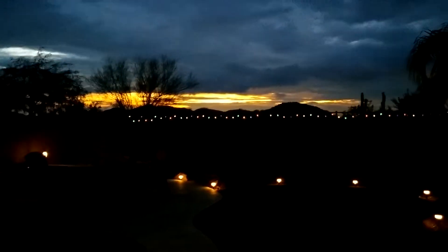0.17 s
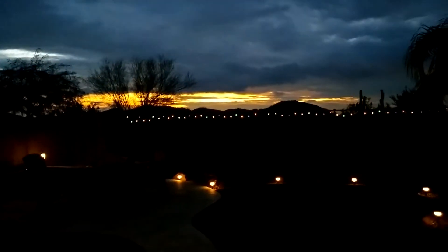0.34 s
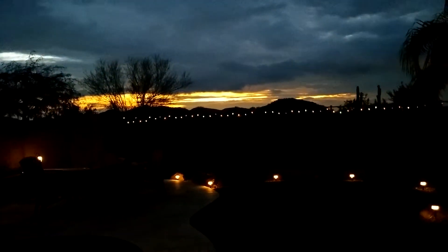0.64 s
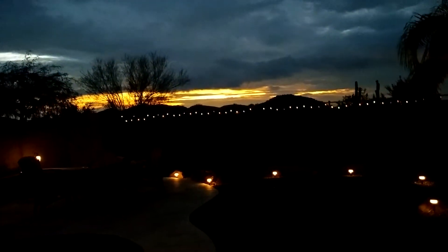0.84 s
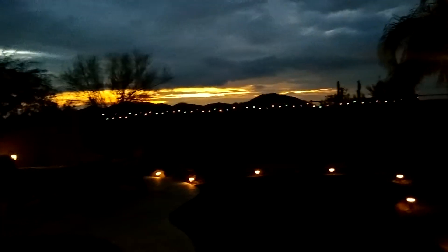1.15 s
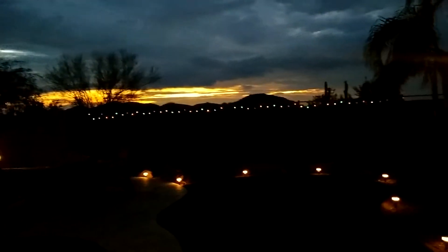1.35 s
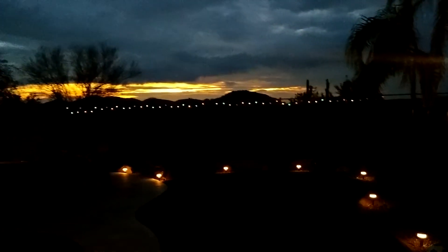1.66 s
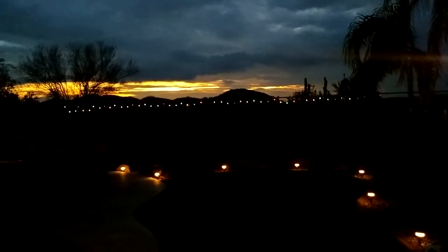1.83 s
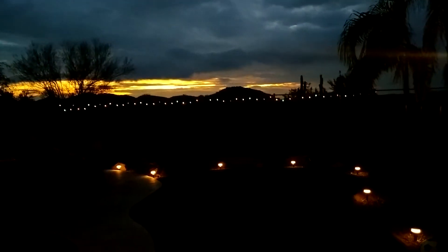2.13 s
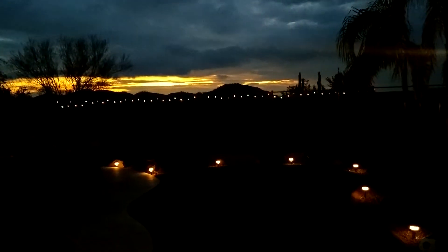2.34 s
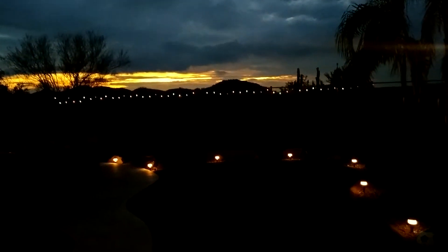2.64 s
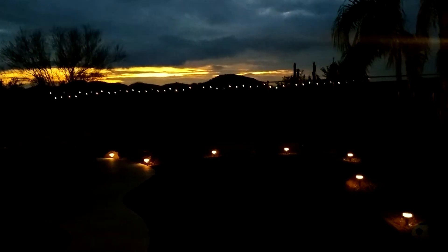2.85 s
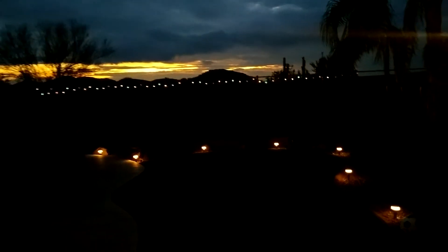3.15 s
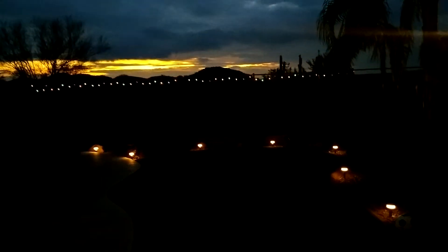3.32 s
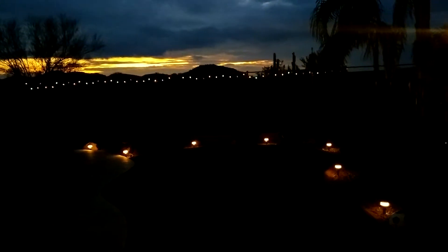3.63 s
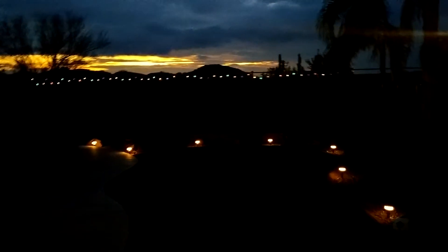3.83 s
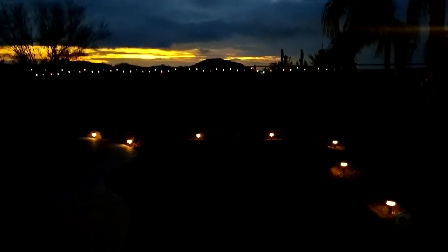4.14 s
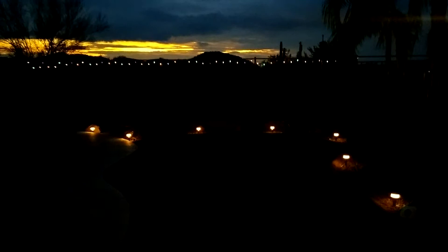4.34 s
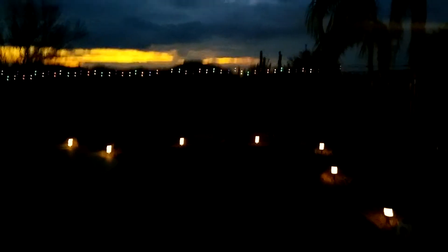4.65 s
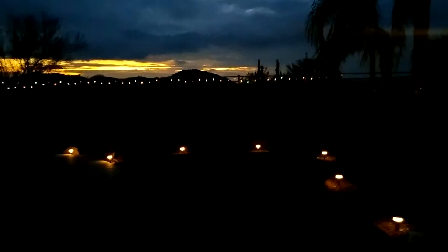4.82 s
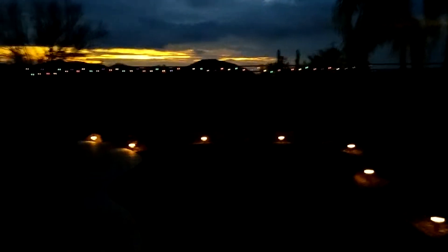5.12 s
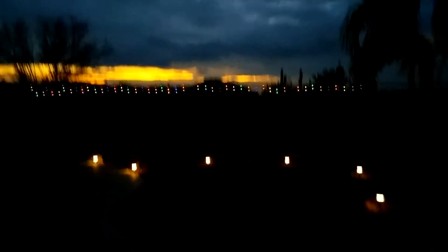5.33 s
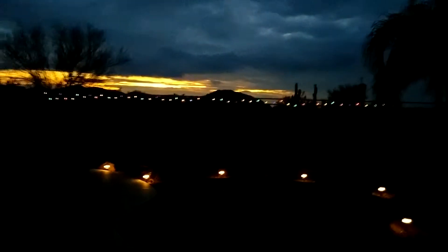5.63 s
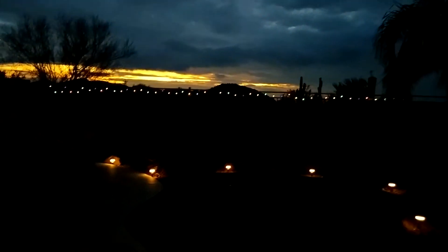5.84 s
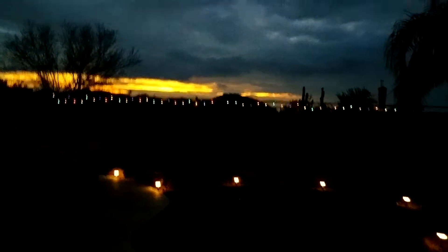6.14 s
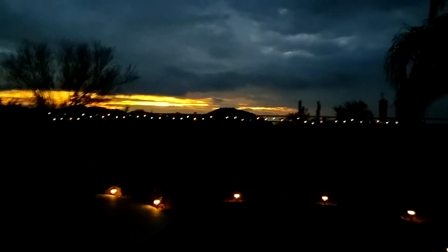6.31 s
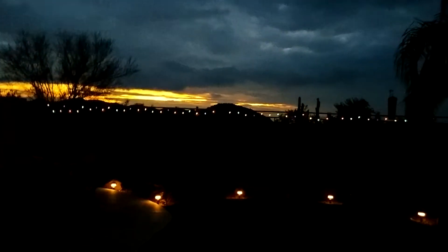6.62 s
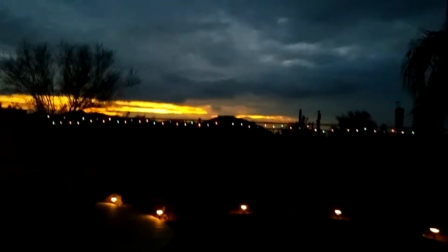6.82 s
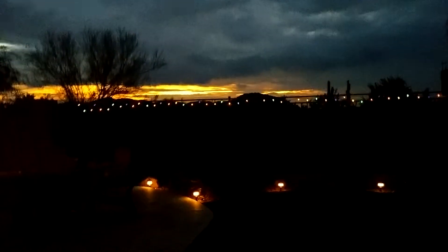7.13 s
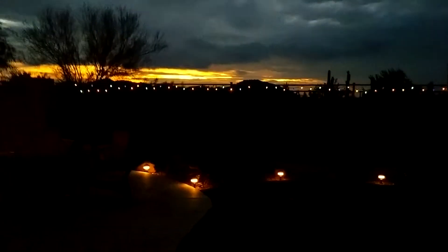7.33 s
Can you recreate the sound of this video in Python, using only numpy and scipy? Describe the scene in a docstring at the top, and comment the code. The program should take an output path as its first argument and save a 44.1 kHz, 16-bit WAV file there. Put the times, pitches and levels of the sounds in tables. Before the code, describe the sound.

Two short coyote calls in a quiet backyard, one scooping up to a high held note, the other a louder run of yips.

```python
"""A coyote howls twice near a backyard at dusk: a rising note that breaks into a high held one, then a
louder, wavering chain of yips. Its vocal folds make an almost pure tone, and its throat shapes the
overtones. House and garden walls throw the voice back, a faint tail hangs over the desert, and hiss
and rumble swell with each howl. Far animals answer faintly and a far motor drones for a moment.
Small ticks and knocks sound near the microphone; faint hisses come and go over a distant town."""
import sys
import numpy as np
from scipy import signal
from scipy.fft import rfft, irfft, next_fast_len
from scipy.io import wavfile
from scipy.ndimage import uniform_filter1d

SR = 44100
rng = np.random.default_rng(int(sys.argv[2]) if len(sys.argv) > 2 else 0)


def transcribe(signal):
    """Save signal, clipped to [-1, 1], as a 16-bit WAV file at the path in sys.argv[1]."""
    frames = np.atleast_2d(signal).T
    limited = np.clip(frames, -1, 1)
    pcm = np.round(limited * 32767).astype(np.int16)
    wavfile.write(sys.argv[1], SR, pcm)


N = 329427
TIME = np.arange(N) / SR

# The first howl scoops upward, breaks into a high note, cracks once, drops back down and ends.
SCOOP_S, BREAK_S, DROP_S, END_S = .772, .912, 1.572, 1.612
CRACK_S, CRACK_LENGTH_S = 1, 0.031

# How the throat shapes the overtones when the mouth is narrow. Each row: frequency in Hz, gain in dB.
NARROW_MOUTH = [(1000, -11.5), (1350, 11), (1600, -5.5), (1850, -12.5), (2100, -8), (2380, -9), (2700, -29),
                (3200, -31), (3600, -56), (10000, -51)]
# The yips of the second howl. Each row: start in seconds, length in seconds, first, top and last pitch
# in Hz, relative level in dB, dip at both ends in dB, share of the yip gone by at its loudest,
# relative overtone level in dB, growl from 0 to 1, relative lift of the upper overtones in dB.
YIPS = [(5.612, 0.13, 484.5, 661, 620, -24.5, 11, 0.64, -55.5, 0.7, 10),
        (5.788, 0.12, 544.6, 798.2, 585.4, -16, 25, 0.46, -45.5, 0.4, 6),
        (5.91, 0.145, 579, 805.3, 668, -20.5, 17, 0.6, -46.5, 0.12, 2),
        (6.055, .13, 681.5, 828, 650, -19.5, 20.5, .45, -46.5, 0.12, 3),
        (6.187, 0.128, 678, 842, 667, -25, 15.5, 0.42, -48, 0.26, 2.5),
        (6.319, 0.13, 657.5, 825.3, 584.5, -22.5, 24.5, 0.45, -50, 0.15, -1),
        (6.504, 0.097, 582, 747.6, 590.5, -24.5, 34.5, 0.52, -52, 0.35, 0)]


def undb(db):
    """Turns decibels into a number to multiply a sound by."""
    return 10 ** (np.asarray(db) / 20)


def curves(table):
    """Joins each column's values with straight lines; the first column gives the times."""
    times, *columns = np.transpose(table)
    return [np.interp(TIME, times, column) for column in columns]


def during(table):
    """One while a table lasts, with short fades to zero outside it."""
    start, end = table[0][0], table[-1][0]
    return np.interp(TIME, [start - .01, start, end, end + 0.0081], [0, 1, 1, 0])


def gate(start, end, attack, release):
    """Rises after the start, holds at one, and falls after the end; all times are in seconds."""
    return np.clip((TIME - start) / attack, 0, 1) * np.clip(1 - (TIME - end) / release, 0, 1)


def bump(middle, half_length):
    """A bell-shaped rise and fall around one moment."""
    return np.exp(-((TIME - middle) / half_length) ** 2)


def arch(progress, peak):
    """Goes from zero up to one and back as progress runs from 0 to 1, highest at `peak`."""
    skew = np.log(.5) / np.log(np.clip(peak, .1, .9))
    return np.sin(np.pi * progress ** skew)


def smooth(x, seconds):
    """Evens out quick changes with a running average."""
    return uniform_filter1d(x, max(int(seconds * SR), 1))


def colour(hz, points):
    """The gain at each frequency, from points in Hz and dB; it falls steeply beyond both ends."""
    point_hz, db = np.transpose(points)
    hz = np.maximum(hz, 1)
    roll_off = np.minimum(1, np.minimum(hz / point_hz[0], point_hz[-1] / hz)) ** 3
    return undb(np.interp(np.log(hz), np.log(point_hz), db)) * roll_off


def wander(rate):
    """A smooth random wobble, about one in size, with roughly `rate` turns a second."""
    size = next_fast_len(N, real=True)
    hz = np.fft.rfftfreq(size, 1 / SR)
    wobble = irfft(rfft(rng.standard_normal(size)) / (1 + (hz / rate) ** 4), size)[:N]
    return wobble / wobble.std()


def noise(points, likeness):
    """Stereo noise shaped by points in Hz and dB; `likeness` is the share common to both sides."""
    size = next_fast_len(N, real=True)
    common = np.sqrt(likeness) * rng.standard_normal(size)
    separate = np.sqrt(1 - likeness) * rng.standard_normal((2, size))
    gains = colour(np.fft.rfftfreq(size, 1 / SR), points)
    shaped = irfft(rfft(common + separate) * gains, size)[:, :N]
    return shaped / shaped.std()


def pan(db):
    """Left and right gains that make the left side `db` decibels louder than the right."""
    return undb(np.array([[db], [-db]]) / 2)


def place(x, pan_db, left_lag_ms):
    """A sound from one side reaches the two microphones at different times and levels."""
    left = np.interp(TIME - left_lag_ms / 1000, TIME, x)
    return np.array([left, x]) * pan(pan_db)


def tail(ring_s, delay_s, points):
    """Many scattered echoes, shaped by points in Hz and dB, that fade by 60 dB in `ring_s`."""
    age = TIME[:2 * SR]
    hz = np.fft.rfftfreq(len(age), 1 / SR)
    mid, side = rfft(rng.standard_normal((2, len(age))))
    likeness = 1 / (1 + (hz / 1100) ** 6)  # only long waves reach both microphones alike
    both = mid * np.sqrt((1 + likeness) / 2) + np.array([[1], [-1]]) * side * np.sqrt((1 - likeness) / 2)
    fade = undb(-60 * age / ring_s) * np.clip(age / delay_s - 1, 0, 1)
    return irfft(both * colour(hz, points), len(age)) * fade / np.sqrt((fade ** 2).sum())


def echo(x, response):
    """Plays a sound through a stereo pattern of echoes."""
    return signal.fftconvolve(np.atleast_2d(x), response, axes=1)[:, :N]


def town():
    """A distant town murmurs under a thin, even hiss."""
    # The tone of the murmur and of the hiss. Each row: frequency in Hz, relative level in dB.
    murmur_tone = [(20, -24), (40, -8.5), (65, -4), (110, -2.5), (190, -1), (300, -10.5), (500, -14),
                   (750, -17.5), (1200, -30.5), (2500, -32.5)]
    hiss_tone = [(400, 8.5), (1500, -1.5), (2400, -3), (3500, -3.5), (6000, -5), (8500, -2.5), (12000, -4),
                 (16000, -5)]
    # How loud the murmur is. Each row: time in seconds, level in dB.
    murmur_levels = [(0, -61), (.8, -63), (1.8, -64.5), (1.95, -71.5), (3.2, -72), (4.8, -75), (5.3, -68.5),
                     (6.85, -67), (7.05, -62.5), (7.47, -64.5)]
    murmur_db, = curves(murmur_levels)
    murmur = noise(murmur_tone, likeness=0.93) * undb(murmur_db + wander(5.7))
    hiss = noise(hiss_tone, likeness=0.029) * undb(-75.5 + 0.47 * wander(8))
    return murmur + hiss


def vocal_folds(start, end, hz, tone_db, overtone_db, throat, jitter, flutter_db, growl, lift_db):
    """The folds make a pure tone and overtones that the throat shapes; returns the two apart."""
    now = (TIME >= start) & (TIME < end + .4)  # extra time for the call to die away
    phase = 2 * np.pi * np.cumsum(hz * (1 + jitter * wander(110))) / SR
    harmonics = np.arange(2, 14)
    gains = [colour(k * hz[now], throat) * undb(lift_db[now] * (k > 2)) for k in harmonics]
    overtones = np.zeros(N)
    overtones[now] = sum(gain * np.sin(k * phase[now]) for k, gain in zip(harmonics, gains))
    overtones[now] /= np.sqrt(sum(gain ** 2 for gain in gains))
    # In a growl the folds beat strong and weak by turns, adding tones halfway between the overtones.
    overtones *= (1 + growl * np.sin(phase / 2)) * undb(2 * flutter_db * wander(90))
    parts = np.array([undb(tone_db) * np.sin(phase), undb(overtone_db) * overtones])
    return np.sqrt(2) * parts * undb(flutter_db * wander(33))


def first_howl_pitch():
    """The voice scoops up, jumps to a high note, cracks once, sags and drops back down."""
    from_hz, to_hz, held_hz, crack_hz, drop_hz = 455, 754, 1273, 1050, 807
    climb = np.clip((TIME - SCOOP_S) / (BREAK_S - SCOOP_S), 0, 1) ** .8  # fast at first, then slower
    scoop = from_hz + (to_hz - from_hz) * climb
    age = np.abs(TIME - BREAK_S)
    waver_hz = -23.37 * np.cos(2 * np.pi * age / 0.112) * np.exp(-age / 0.29)
    settle_hz = 89.6 * np.exp(-age / 0.0096)  # the note is reached from below
    sag_hz = 117.4 * np.exp(-np.abs(DROP_S - TIME) / 0.035)  # it sinks as the air runs out
    held = held_hz + waver_hz - settle_hz - sag_hz
    cracked = np.abs(TIME - CRACK_S) < CRACK_LENGTH_S / 2
    hz = np.select([TIME < BREAK_S, cracked, TIME < DROP_S], [scoop, crack_hz, held], drop_hz)
    return smooth(hz, seconds=.007) * (1 + 0.0025 * wander(12))


def first_howl():
    """A clean howl through a wide mouth, strong at first and then held softly."""
    # How the throat shapes the overtones when the mouth is wide. Each row: frequency in Hz, gain in dB.
    wide_mouth = [(1000, 0), (1400, -6), (1700, -5), (2100, 3), (2550, 0), (2800, -19), (3100, -11),
                  (3500, -14), (3850, -29), (4300, -24), (4800, -31), (5900, -38), (6500, -18), (7600, -30),
                  (8900, -23), (10500, -46)]
    # How hard the coyote calls. Each row: time in seconds, relative tone and overtone levels in dB.
    effort = [(0.76, -85, -94), (0.79, -48, -69.5), (.812, -50.5, -60.5), (0.836, -50, -67),
              (0.884, -27.5, -53), (0.906, -30.5, -54), (0.944, -32, -41.5), (.968, -50, -45.5),
              (.98, -29.5, -49.5), (1.0, -43, -45), (1.026, -29, -53), (1.04, -33, -49), (1.092, -43, -48),
              (1.136, -30, -53.5), (1.165, -43, -47), (1.2, -37, -62.5), (1.212, -50, -81),
              (1.26, -53.5, -69), (1.44, -48, -68), (1.48, -54, -68.5), (1.542, -42.5, -70),
              (1.612, -49, -83), (1.63, -64, -91)]
    tone_db, overtone_db = curves(effort)
    # The pitch is rough in the scoop, at the break and the crack, and on the closing low note.
    scooping = np.clip((BREAK_S - TIME) / (BREAK_S - SCOOP_S), 0, 1)
    breaking = bump(BREAK_S, .012) + bump(CRACK_S, .012)
    dropping = gate(DROP_S, END_S, attack=0.016, release=0.01)
    jitter = 0.003 + .012 * scooping + .07 * breaking + 0.043 * dropping
    # The upper overtones soften once the note has settled.
    settled = np.clip((TIME - CRACK_S - CRACK_LENGTH_S / 2) / CRACK_LENGTH_S, 0, 1)
    parts = vocal_folds(SCOOP_S, END_S, first_howl_pitch(), tone_db, overtone_db, wide_mouth,
                        jitter=jitter, flutter_db=.7, growl=0.035, lift_db=-3 * settled - 1.5)
    return parts * gate(SCOOP_S, END_S, attack=0.006, release=0.026)


def squeals():
    """A second, hoarse pitch arches briefly where the voice starts, catches or peaks."""
    # The squeals. Each row: middle in seconds, length in seconds, top pitch in Hz, relative level in dB.
    catches = [(.788, 0.039, 1190, -62), (1.588, 0.016, 1560, -59.5), (5.854, 0.05, 3160, -56),
               (6.138, 0.044, 1020, -42.5), (6.266, 0.063, 985, -43.5)]
    out, waver = np.zeros(N), wander(240)
    for middle, length, top_hz, db in catches:
        bow = np.maximum(1 - (2 * (TIME - middle) / length) ** 2, 0)
        hz = top_hz * (1 - 0.13 * (1 - bow)) * (1 + 0.035 * waver)
        out += undb(db + 7.5) * bow * np.sin(2 * np.pi * np.cumsum(hz) / SR)
    return out


def rasp(voice):
    """A rough noise around the voice that follows its loudness."""
    # The tone of the rasp. Each row: frequency in Hz, relative level in dB.
    rasp_tone = [(250, -9), (500, -7), (750, 9), (1000, -3.5), (1400, 1.5), (1800, -8.5), (2400, -9),
                 (3000, -17), (3800, -46), (5500, -47)]
    loudness = smooth(np.abs(voice), seconds=0.03).clip(0)
    return noise(rasp_tone, likeness=0.18) * loudness ** 0.7 * undb(-32 + 2.1 * wander(37))


def whistle():
    """A high, airy edge as the first howl opens."""
    # How loud the whistle is. Each row: time in seconds, level in dB.
    whistle_levels = [(.77, -121), (.81, -68.5), (.88, -67), (.94, -66.5), (1.0, -95)]
    db, = curves(whistle_levels)
    air = noise([(5600, -27.5), (6500, 10.5), (7300, -16), (9000, -47)], likeness=.3)
    return air * undb(db) * during(whistle_levels)


def yard_echoes(voice):
    """Near walls throw the voice back, the yard rings briefly and the land beyond adds a faint tail."""
    # Echoes off ground and walls, a left list then a right one. Each row: delay in seconds, level in dB.
    walls = [
        [(.0113, -20), (.034, -23), (.061, -24)],
        [(.0087, -20), (.027, -23), (.055, -24)],
    ]
    ring_tone = [(200, -19), (700, -20), (830, -10), (1050, -14), (1400, -10), (2400, -3.5), (12000, -4)]
    land_tone = [(200, -46.5), (750, -37.5), (1300, -31.5), (2500, -28)]
    ring = tail(ring_s=.36, delay_s=.008, points=ring_tone)
    land = tail(ring_s=1.5, delay_s=0.07, points=land_tone)
    response = ring + undb(-1.5) * land
    for side, bounces in zip(response, walls):
        for delay, db in bounces:
            side[int(delay * SR)] += undb(db)
    return echo(voice, response)


def swells(voice):
    """Hiss and a low, gusty rumble rise and fall with the loudness of the voice."""
    # The tone of the hiss and of the rumble. Each row: frequency in Hz, relative level in dB.
    hiss_tone = [(400, -4.5), (1500, -17.5), (3300, 4.5), (4700, 4.5), (6000, 2.5), (9000, 2.5),
                 (11500, -12.5), (13000, -3), (16000, -0.5)]
    rumble_tone = [(20, -23), (40, -10), (70, 2), (105, -3), (180, 0.5), (300, -10.5), (500, -6.5),
                   (900, -29.5)]
    loudness = smooth(np.abs(voice), seconds=.11).clip(0)
    sounding = smooth(np.abs(voice), seconds=.01) > undb(-60)
    hiss = noise(hiss_tone, likeness=.05) * loudness ** 0.38 * undb(-53.5 + .5 * wander(20))
    rumble = noise(rumble_tone, likeness=0.92) * loudness ** 0.29 * undb(-45 + 2.9 * wander(13))
    # The very top of the hiss stands out only in the loudest yips.
    fizz = noise([(7000, -5.5), (9500, -0.5), (12000, -4), (16000, -11)], likeness=.05)
    fizz *= smooth(loudness, seconds=.25).clip(0) ** 0.91 * undb(-40)
    return (hiss + fizz + rumble) * smooth(sounding.astype(float), seconds=0.094)


def air_puffs():
    """Air bumps against the microphone and makes soft, low rumbles."""
    # The puffs. Each row: middle in seconds, half length in seconds, level in dB.
    puffs = [(1.114, 0.093, -52), (2.98, 0.033, -63.5), (6.46, 0.066, -43.5), (6.633, 0.038, -46),
             (7.001, 0.26, -64.5)]
    strength = sum(undb(db) * bump(middle, half_length) for middle, half_length, db in puffs)
    return noise([(30, -11), (70, 9.5), (130, 0), (300, -5)], likeness=0.21) * strength * pan(1.4)


def faint_hisses():
    """Faint, thin hisses that start suddenly; the last lingers as the final yip ends."""
    # The hisses. Each row: start in seconds, length in seconds, level in dB.
    hisses = [(1.79, 0.043, -71), (1.99, 0.22, -69), (2.343, 0.015, -64.5), (2.377, 0.32, -70),
              (6.6, 0.047, -65.5)]
    # The tone of these hisses. Each row: frequency in Hz, relative level in dB.
    hiss_tone = [(1500, -4.5), (3300, -6.5), (4700, -1), (5700, 1.5), (6800, -5), (9500, -2.5),
                 (12000, -15), (16000, -8)]
    strength = sum(undb(db) * gate(start, start + length, attack=0.0086, release=0.048)
                   for start, length, db in hisses)
    return noise(hiss_tone, likeness=0.07) * strength * undb(1.2 * wander(25))


def far_animals():
    """Far animals call back with hoarse, sliding notes, blurred by the distance."""
    # The calls. Each row: start in seconds, length in seconds, first and last pitch in Hz, relative
    # level in dB, level of the octave overtone against the tone in dB, pitch roughness from 0 to 1.
    calls = [(1.953, 0.24, 617, 680, -78.5, -4.5, 0.1), (2.399, 0.093, 1028, 850, -78.5, 2.5, 0.15),
             (2.551, 0.039, 801, 804, -71, -1, 0.12), (4.179, 0.18, 688, 655, -83, 2.5, 0.1),
             (5.166, 0.33, 712, 731, -81.5, -20, 0.05), (5.325, .11, 1126, 1007, -88.5, 2, .1),
             (7.041, 0.43, 676.3, 654, -76.5, -24, 0)]
    out, waver = np.zeros(N), wander(160)
    for start, length, first_hz, last_hz, db, octave_db, jitter in calls:
        progress = np.clip((TIME - start) / length, 0, 1)
        hz = (first_hz + (last_hz - first_hz) * progress) * (1 + jitter * waver)
        phase = 2 * np.pi * np.cumsum(hz) / SR
        strength = undb(db + 11.5) * np.abs(np.sin(np.pi * progress)) ** .5
        out += strength * (np.sin(phase) + undb(octave_db) * np.sin(2 * phase))
    return undb(-12) * out + echo(out, tail(ring_s=.6, delay_s=.01, points=[(300, -2), (3000, -3)]))


def knocks():
    """Small ticks, knocks and thumps: each rings at one pitch under a bright crack; the yard echoes."""
    # The hits. Each row: start in seconds, relative level in dB, ringing pitch in Hz, width of that
    # ring in Hz, seconds to fade by 60 dB, crack against the ring in dB, left minus right in dB.
    hits = [(2.177, -65.5, 1720, 1470, 0.11, 10, 0), (2.952, -73.5, 2840, 2970, 0.31, 15.5, 0.5),
            (3.262, -68.5, 1560, 1207, 0.21, -0.5, -1), (3.557, -58, 4200, 1516, 0.11, 10, 0),
            (3.629, -46.5, 1092, 596, 0.06, -17, -2.5), (4.177, -50, 3150, 700, 0.022, -10, 7),
            (4.18, -59.5, 800, 1700, .12, -25, -4.5), (5.043, -58, 180, 130, .04, -57, -6),
            (5.104, -63, 170, 130, .04, -30, -3), (5.185, -67, 185, 110, .08, -38, 6),
            (5.269, -64, 195, 130, .04, -47, 2), (5.508, -69, 1000, 1900, 0.07, -1, 3),
            (6.289, -50, 1300, 1400, 0.015, -38.5, -5), (6.616, -23, 856, 600, 0.02, -38, 3.5),
            (6.915, -42, 1550, 1950, 0.02, -44, -5), (6.933, -37.5, 863, 1420, 0.03, -8, -6.5),
            (6.949, -56, 914, 2470, 0.18, -39, -20), (7.192, -51, 1190, 798, 0.025, -15, -25.5),
            (7.301, -61, 5000, 2560, 0.023, 10.5, -12)]
    out = np.zeros((2, N))
    crack = noise([(400, 10.5), (2000, 0.5), (5000, 4), (12000, 2), (16000, -14)], likeness=0.24)
    for start, db, hz, width_hz, ring_s, crack_db, pan_db in hits:
        now = slice(*np.searchsorted(TIME, [start, start + .5]))
        resonance = signal.iirpeak(hz, hz / width_hz, fs=SR)
        body = signal.lfilter(*resonance, signal.lfilter(*resonance, crack[:, now]))
        burst = body / body.std() + undb(crack_db) * crack[:, now]
        age = TIME[now] - start
        fade = undb(-60 * np.minimum(age / ring_s, 3)) * np.minimum(age / 0.0015, 1)
        out[:, now] += undb(db - 2) * pan(pan_db) * fade * burst
    yard_ring = tail(ring_s=0.48, delay_s=0.0031, points=[(200, -23), (1500, -5.5), (15000, -13.5)])
    return out + echo(out, yard_ring)


def far_motor():
    """A far motor drones for a moment on one unsteady low note."""
    # How loud the motor is. Each row: time in seconds, level in dB.
    motor_levels = [(3.5, -97), (3.8, -74.5), (4.05, -68), (4.35, -72), (4.6, -84.5)]
    db, = curves(motor_levels)
    hz = 205 * (1 + 0.0341 * wander(18))
    drone = np.sqrt(2) * np.sin(2 * np.pi * np.cumsum(hz) / SR)
    return drone * undb(db + 3.2 * wander(27)) * during(motor_levels)


def yip_shapes():
    """Pitch, levels, growl and lift over time: each yip arches up and down, then fades until the next."""
    pitch_peak, fade_db_per_s = .6, 268
    shapes = np.zeros((5, N))
    for k, yip in enumerate(YIPS):
        start, length, first_hz, top_hz, last_hz, db, dip_db, loud_peak, overtone_db, growl, lift_db = yip
        now = TIME >= (start if k else 0)
        age = TIME[now] - start
        progress = np.clip(age / length, 0, 1)
        foot_hz = np.where(progress < pitch_peak, first_hz, last_hz)
        hz = foot_hz + (top_hz - foot_hz) * arch(progress, pitch_peak)
        fade_db = fade_db_per_s * np.maximum(age - length, 0)
        tone_db = db - dip_db * (1 - arch(progress, loud_peak)) - fade_db
        throat_db = 0.99 * 20 * np.log10(colour(2 * hz, NARROW_MOUTH))  # louder where the throat rings
        squeeze_db = 5.5 * (progress - 1)  # the overtones grow as the throat tightens
        shaped_overtone_db = overtone_db + throat_db + squeeze_db - fade_db
        shapes[:, now] = np.broadcast_arrays(hz, tone_db, shaped_overtone_db, growl, lift_db)
    return smooth(shapes, seconds=0.0078)


def second_howl():
    """A louder, hoarser chain of yips through a narrow mouth, starting with a growl."""
    # Surges at the top of some yips. Each row: middle in seconds, half length in seconds, boost in dB.
    surges = [(5.857, .008, 5), (5.981, 0.015, 8.5), (6.235, 0.0083, 6.5)]
    hz, tone_db, overtone_db, growl, lift_db = yip_shapes()
    surge_db = sum(db * bump(middle, half_length) for middle, half_length, db in surges)
    first_yip_s, last_yip_s = YIPS[0][0], YIPS[-1][0]
    parts = vocal_folds(first_yip_s, last_yip_s, hz, tone_db + surge_db, overtone_db, NARROW_MOUTH,
                        jitter=.011 + 0.029 * growl, flutter_db=1.6, growl=growl, lift_db=lift_db - 2)
    fade_in = np.clip((TIME - first_yip_s) / 0.067, 0, 1) ** 2
    return parts * fade_in


def coyote():
    """Both howls reach the microphones, along with their echoes and the noises that follow the voice."""
    first_tone, first_overtones = first_howl()
    second_tone, second_overtones = second_howl()
    squeal = squeals()
    voice = first_tone + first_overtones + second_tone + second_overtones + squeal
    direct = (undb(-3) * place(first_tone, pan_db=4, left_lag_ms=0.19)
              + undb(2.5) * place(first_overtones, pan_db=-8, left_lag_ms=0.25)
              + undb(-3.5) * place(second_tone, pan_db=0.5, left_lag_ms=-0.14)
              + place(second_overtones + squeal, pan_db=3, left_lag_ms=-0.13))
    return direct + rasp(voice) + whistle() + yard_echoes(voice) + swells(voice)


def rustle():
    """Soft handling after the knocks: uneven rubbing close to the microphone, mostly on the right."""
    # How loud the rustle is. Each row: time in seconds, relative level in dB.
    rustle_levels = [(6.92, -83.5), (6.96, -61.5), (7.03, -71), (7.47, -71)]
    db, = curves(rustle_levels)
    rustle_tone = [(300, -2), (1400, 7.5), (2800, 4), (4500, -1.5), (9200, 1.5), (10800, -8)]
    rubbing = noise(rustle_tone, likeness=0.079)
    return rubbing * pan(-11) * undb(db + 3.2 * wander(21.6)) * during(rustle_levels)


def scene():
    """The coyote near the yard, with the small sounds around it."""
    return (coyote() + far_animals() + air_puffs() + knocks() + faint_hisses() + rustle()
            + town() + far_motor())


def record(dry):
    """The phone cuts off the highest treble."""
    top_hz = 15750
    return signal.sosfilt(signal.ellip(10, .2, 80, top_hz, fs=SR, output="sos"), dry)


dry = scene()
out = record(dry)
transcribe(out)
```